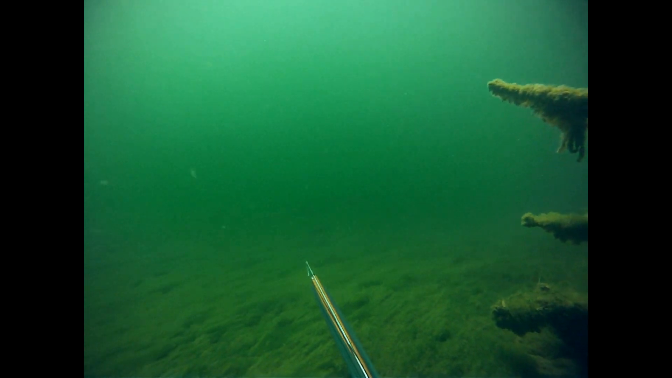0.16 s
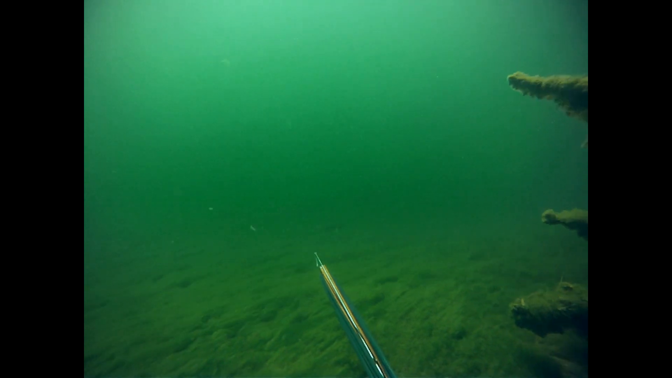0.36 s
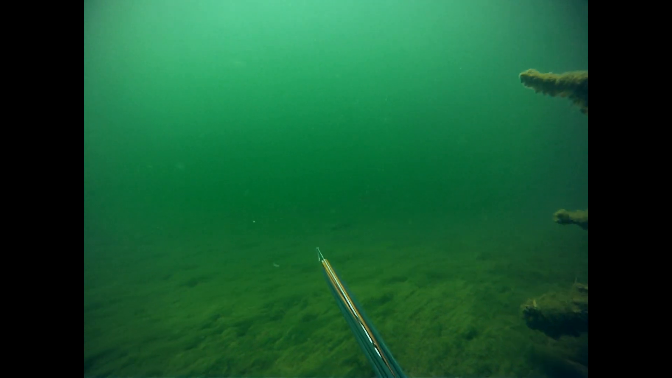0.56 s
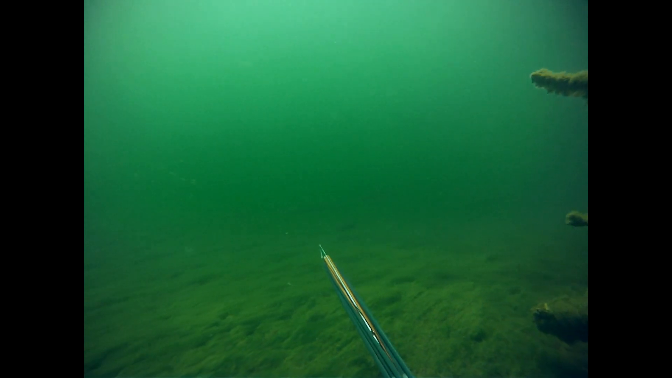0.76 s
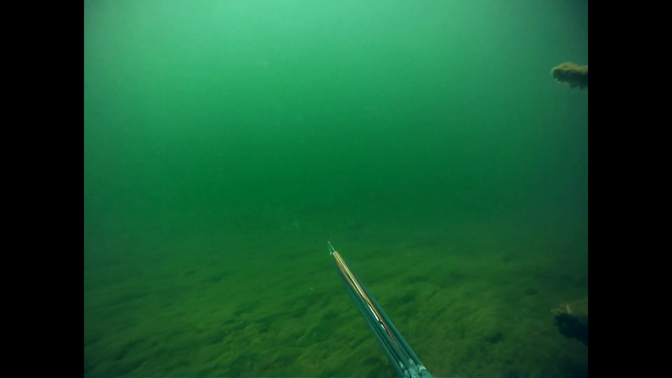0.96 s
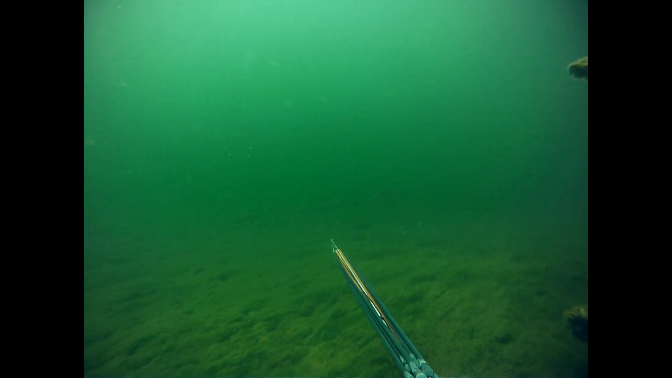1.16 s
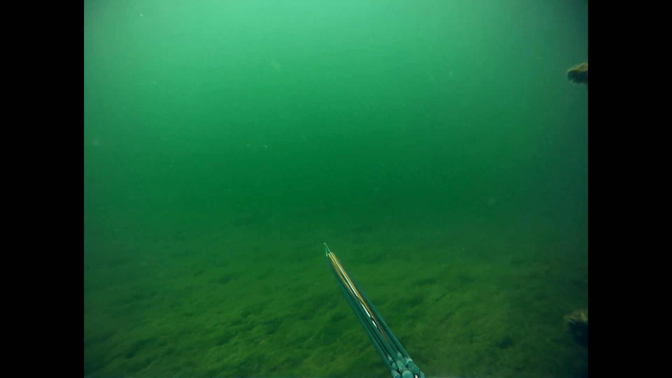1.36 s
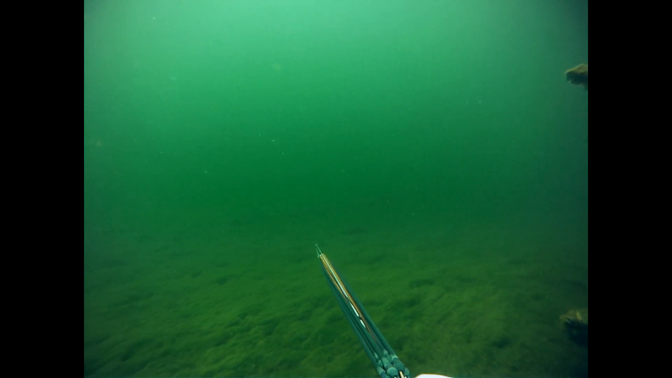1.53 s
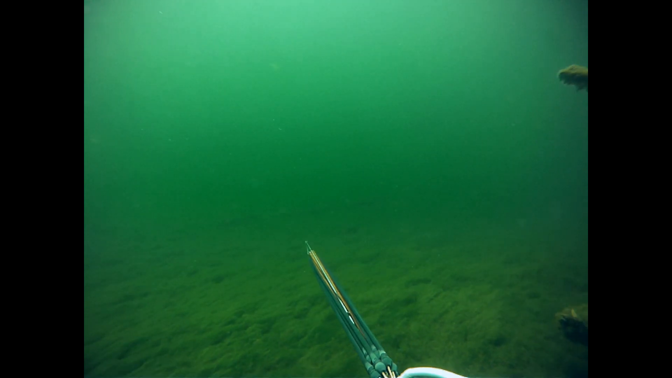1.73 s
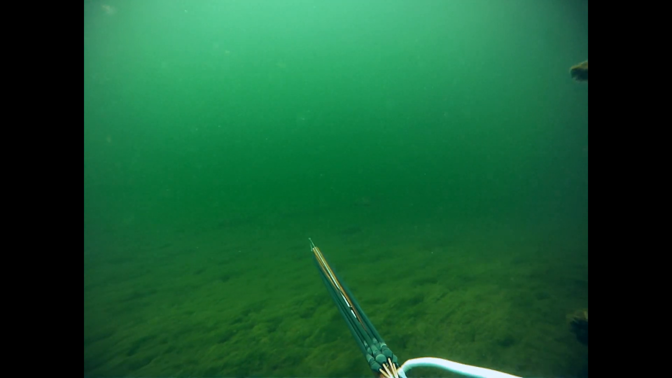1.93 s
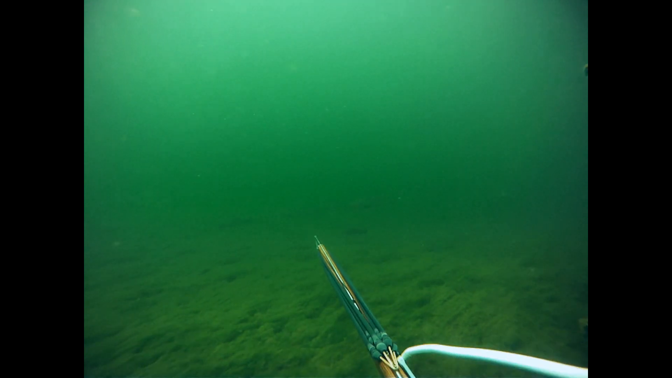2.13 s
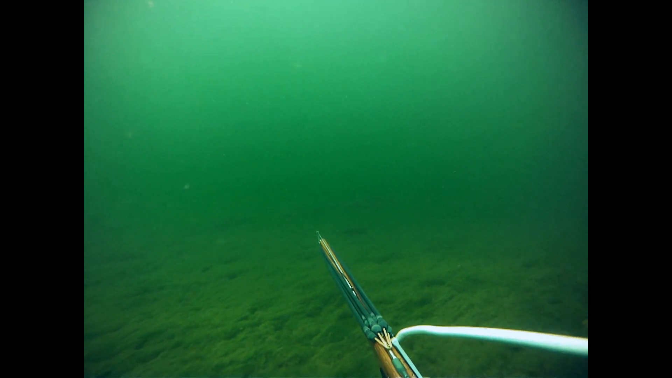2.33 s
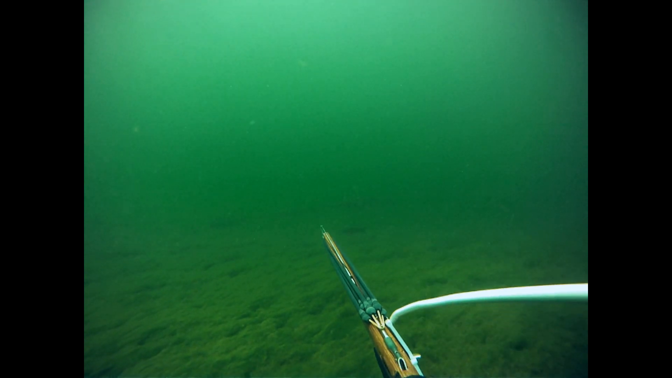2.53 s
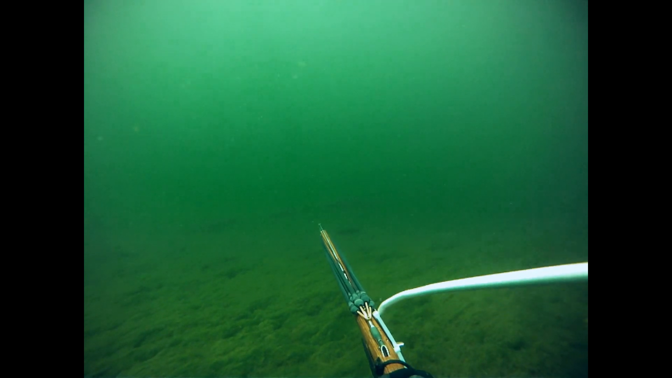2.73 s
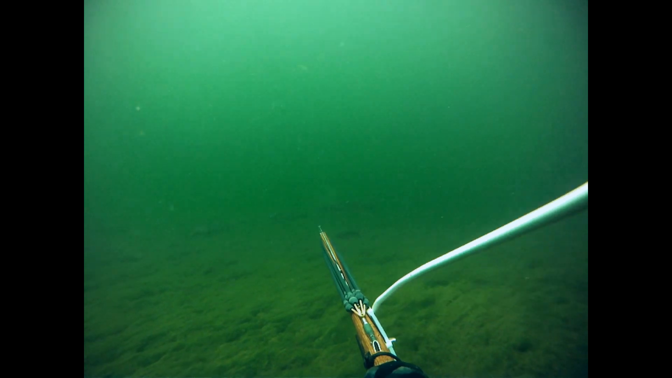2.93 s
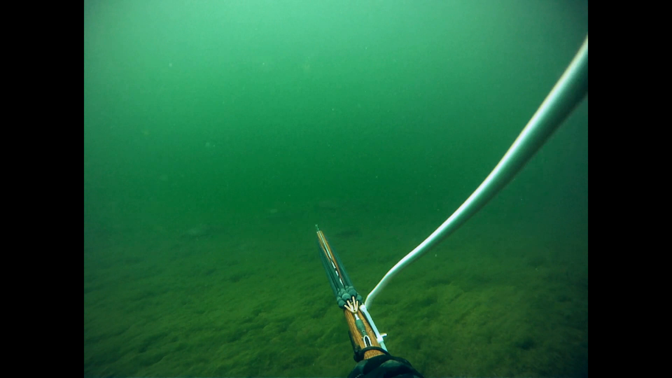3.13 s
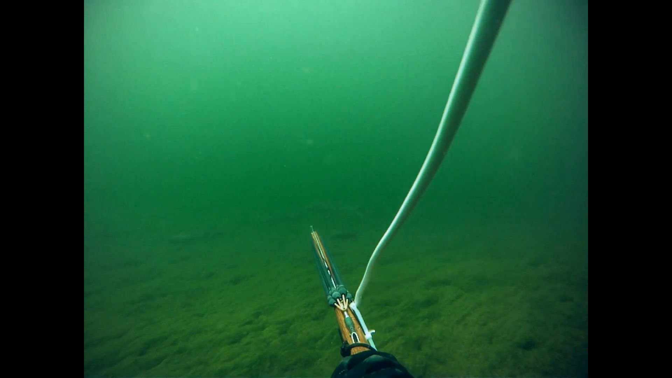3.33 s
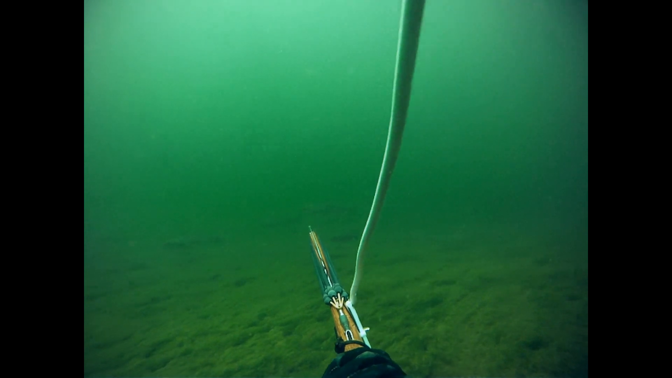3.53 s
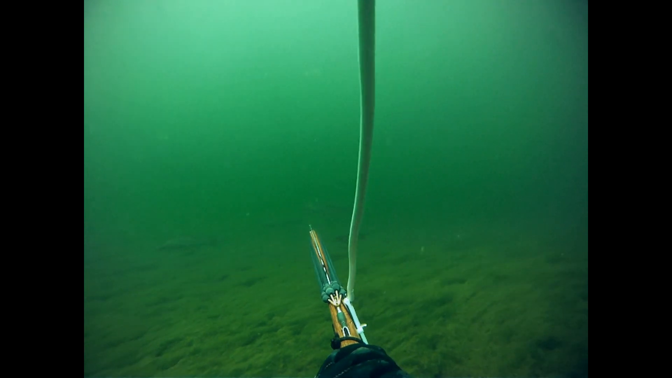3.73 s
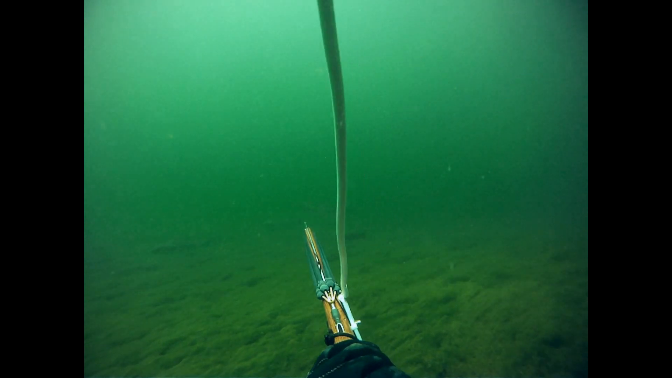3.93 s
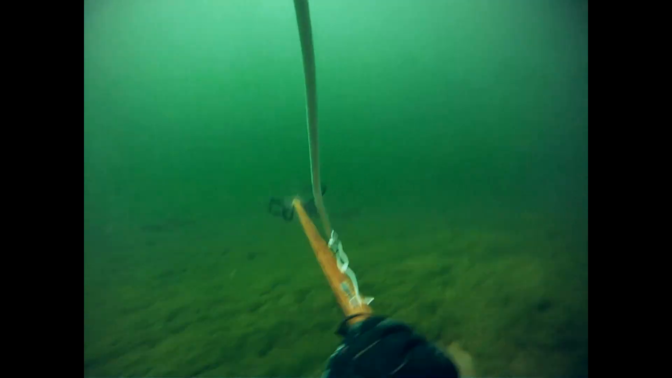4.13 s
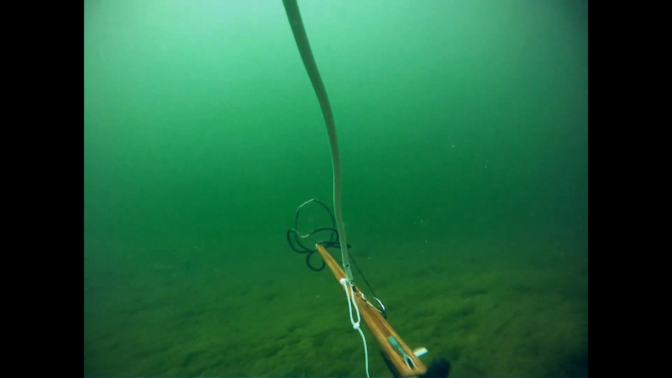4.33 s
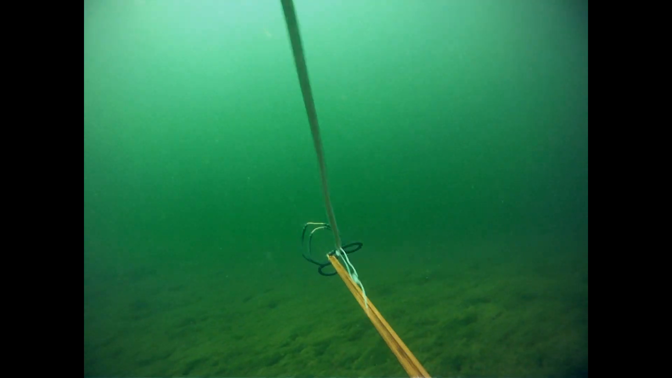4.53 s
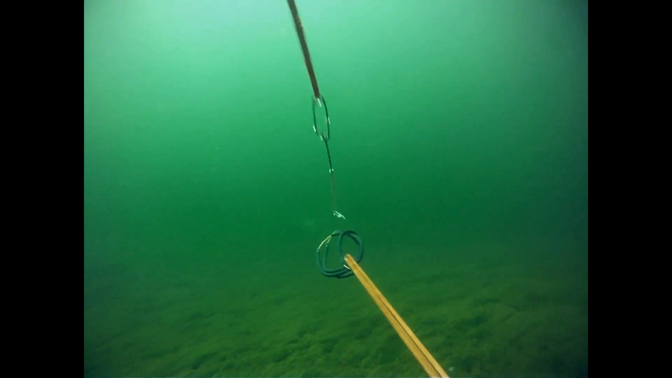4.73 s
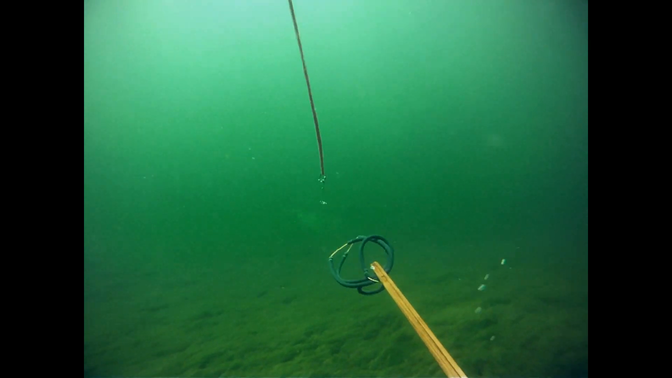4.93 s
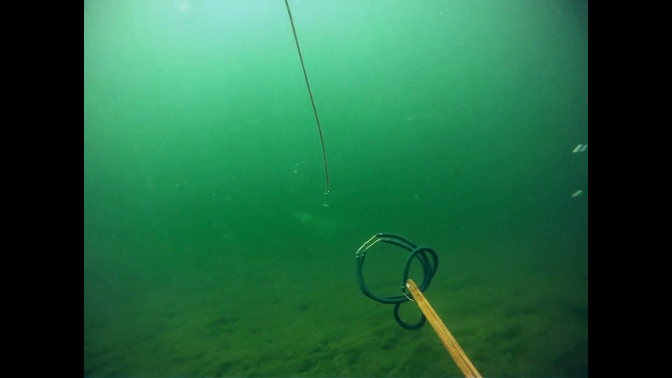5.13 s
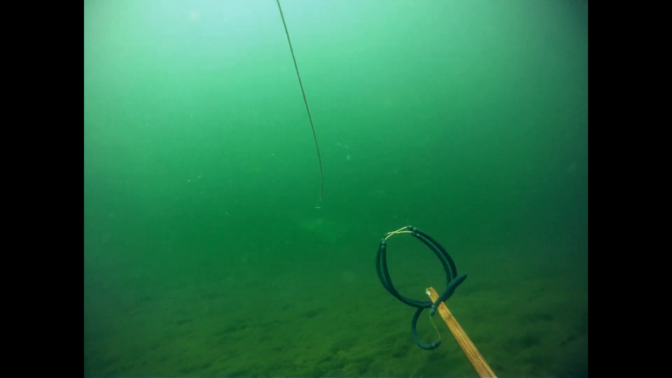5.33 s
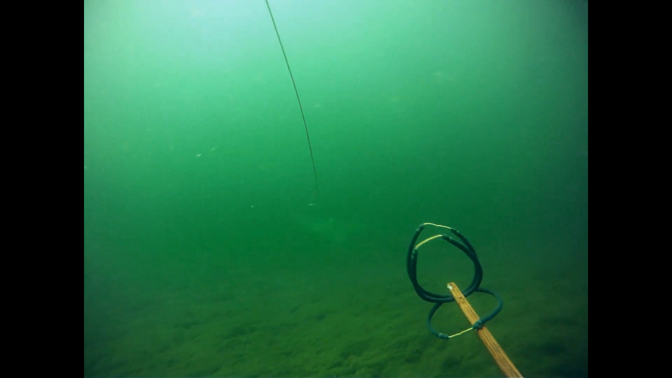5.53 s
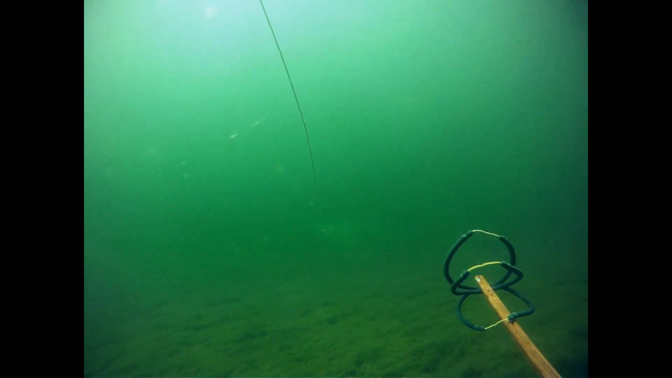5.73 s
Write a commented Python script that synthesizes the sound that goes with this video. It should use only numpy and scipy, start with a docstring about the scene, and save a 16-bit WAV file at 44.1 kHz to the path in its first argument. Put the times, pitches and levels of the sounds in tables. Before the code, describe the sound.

Underwater, a speargun knocks softly while aiming, then fires with one loud crack, a quick clatter and a fading rush of line.

```python
"""A speargun fired under water

Water rumbles round a camera in a sealed housing, and the gun's grip rubs and knocks while aiming.
The trigger cracks, the shaft scrapes off its rail and the rubber bands shove the water. The line
rattles out with a fading rush and a low strum. The camera samples coarsely, adding a gritty sheen."""
import sys
import numpy as np
from scipy.fft import rfft, irfft, next_fast_len
from scipy.io import wavfile
from scipy.ndimage import map_coordinates

SR = 44100
rng = np.random.default_rng(int(sys.argv[2]) if len(sys.argv) > 2 else 0)


def transcribe(signal):
    """Save signal, clipped to [-1, 1], as a 16-bit WAV file at the path in sys.argv[1]."""
    frames = np.atleast_2d(signal).T
    limited = np.clip(frames, -1, 1)
    pcm = np.round(limited * 32767).astype(np.int16)
    wavfile.write(sys.argv[1], SR, pcm)


N = 254898
TIME = np.arange(N) / SR
SHORT = TIME[:SR // 4]  # clock for one brief sound
FIRE_S, BANDS_MOVE_S = 4.02, 0.2  # when the trigger lets go, and how long the bands move
CAMERA_RATE_HZ = 12000


def amp(db):
    """Turn decibels into a number to multiply by."""
    return 10 ** (np.asarray(db) / 20)


def unit(x):
    """Scale a sound to an average (rms) strength of 1."""
    return x / np.sqrt(np.mean(x ** 2) + 1e-20)


def wobble(rate):
    """A smooth random curve through `rate` points a second."""
    return map_coordinates(rng.standard_normal(int(N * rate / SR) + 4), [TIME * rate])


def filtered(x, response):
    """Boost or cut each pitch in x as the response says."""
    size = next_fast_len(len(x) + 8192)
    return irfft(rfft(x, size) * response(np.fft.rfftfreq(size, 1 / SR)), size)[:len(x)]


def colour(points):
    """A response that joins up (pitch [Hz], level [dB]) points."""
    hz, db = np.transpose(points)
    return lambda f: amp(np.interp(np.log(f + 1), np.log(hz), db))


def resonant(modes):
    """The response of a thing that rings at each (pitch [Hz], width [Hz], level [dB])."""
    return lambda f: sum((-1) ** k * amp(db) * 1j * f * width / (hz * hz - f * f + 1j * f * width)
                         for k, (hz, width, db) in enumerate(modes))


def noise(response):
    """Noise shaped by a response, at strength 1."""
    return unit(filtered(rng.standard_normal(N), response))


def tone(hz, phase=0):
    """A brief pure tone; phase is in cycles."""
    return np.sin(2 * np.pi * (hz * SHORT + phase))


def swell(rise_s, order=1):
    """Rise to 1 at rise_s, then die away; a higher order makes a narrower bump."""
    progress = SHORT / max(rise_s, 1 / SR)
    return (progress * np.exp(1 - progress)) ** order


def add(track, s, sound):
    """Mix a sound in at s seconds."""
    part = track[round(s * SR):][:len(sound)]
    part += sound[:len(part)]


# Tone of still water and microphone hiss: (pitch [Hz], relative level [dB])
HISS_COLOUR = [(12, -47.5), (20, -4), (48, 1), (81, -7), (119, -5), (272, -12), (329, -15), (427, -15.5),
               (1730, -22.5), (2190, -23.5), (5030, -29), (5800, -29.5), (7540, -53), (12800, -120)]


def water(hiss_db=-60, rest_db=-70, push_db=-57, push_s=0.68):
    """Steady hiss, and a rumble of water round the housing that swells as the gun is pushed forward."""
    rumble = noise(colour([(15, -6.5), (42, -8), (100, -6.5), (200, -24), (600, -46.5)]))
    flow_db = np.interp(TIME, [FIRE_S - push_s, FIRE_S, N / SR], [rest_db, push_db, rest_db])
    return amp(flow_db + 2.5 * wobble(3)) * rumble + amp(hiss_db) * noise(colour(HISS_COLOUR))


def chinks(per_s, centre_hz, octaves, ring_s):
    """Tiny contacts ring at random moments, each with its own pitch and size."""
    out = np.zeros(N)
    brief = SHORT[:SR // 20]
    fade = amp(-60 * brief / ring_s)
    for moment, pitch, size in rng.random((int(per_s * N / SR), 3)):
        hz = centre_hz * 2 ** (octaves * (2 * pitch - 1))
        add(out, moment * N / SR, -np.log(size) * fade * np.sin(2 * np.pi * hz * brief))
    return unit(out)


def rubbing():
    """A faint scratchy rub early on, then the grip creaks just before the aim settles."""
    grit = chinks(per_s=700, centre_hz=3940, octaves=0.18, ring_s=0.0076)
    grit += 0.81 * noise(resonant([(4000, 900, 0)]))
    scratch = np.interp(TIME, [0.385, 0.4, 0.49, 0.505], [0.1, 0.33, 0.46, 0.098]) * unit(grit)
    groan = noise(lambda f: resonant([(370, 110, 0)])(f) ** 2)
    creak = np.interp(TIME, [2.64, 2.66, 2.705, 2.72], [0.037, 0.26, 0.84, 0.039]) * groan
    return amp(-60) * scratch + amp(-49) * creak


# The sharp edge of a hit, heard straight from the steel: (pitch [Hz], relative level [dB])
EDGE_COLOUR = [(200, -12), (700, -11), (1100, -25), (2300, -3.5), (4000, 4), (5800, -5)]
# How the steel shaft rings: (pitch [Hz], width [Hz], relative level [dB])
SHAFT_RING = [(1720, 31, -4.5), (1980, 28, -9), (2130, 32, -7), (2365, 24, -4.5), (3510, 70, -17)]


def hit(force, body, centre_hz, edge_db, shaft_db, focus_db=8):
    """A rough contact rings a body and the shaft, while its sharp edge arrives directly."""
    burst = rng.standard_normal(len(force)) * force
    even_spectrum = np.exp(1j * np.angle(rfft(burst)))  # all pitches are struck alike
    burst = irfft(even_spectrum, len(force)) * np.sqrt(force)
    edge = unit(filtered(burst, lambda f: colour(EDGE_COLOUR)(f) * (f < CAMERA_RATE_HZ / 2)))
    # the spot that is struck favours ringing near one pitch
    focus = resonant([(centre_hz, centre_hz / 4, 0)])
    burst = filtered(burst, lambda f: 1 + amp(focus_db) * focus(f))
    shaft = unit(filtered(burst, resonant(SHAFT_RING)))
    sound = unit(filtered(burst, resonant(body))) + amp(edge_db) * edge + amp(shaft_db) * shaft
    return unit(sound) * np.sqrt(np.mean(force ** 2))


# How the grip and the wooden barrel ring: (pitch [Hz], width [Hz], relative level [dB])
GRIP_RING = [(900, 580, -4), (1500, 390, 0), (1916, 345, 4), (2300, 280, 2.5), (3650, 300, -6)]
WOOD_RING = [(537, 370, -1.5), (757, 180, -0.5), (1090, 250, 1)]
# The wood's low tones under every thud: (pitch [Hz], relative level [dB])
HOLLOW_TONES = [(178, -10), (365, -12), (511, -18)]
# Knocks on the gun: (time [s], relative thud level [dB], relative click level [dB], thud pitch [Hz])
KNOCKS = [(0.508, -37.5, -43.5, 354), (0.539, -50, -48, 280), (0.569, -46, -62, 328),
          (1.405, -38, -63, 154), (1.7609, -27, -34.5, 281), (1.774, -31, -51, 345),
          (2.031, -43.5, -68, 324), (2.047, -37.5, -63, 366), (2.222, -39.5, -56, 282),
          (2.273, -37.5, -52, 345), (2.425, -40, -51.5, 334), (2.458, -43, -68, 366),
          (2.506, -39, -60, 294), (2.612, -38, -47, 370), (2.6231, -17, -25, 372),
          (2.629, -28.5, -33.5, 505), (2.695, -38, -42.5, 332), (2.721, -26.5, -23, 180),
          (4.155, -21.5, -42, 223), (4.175, -17.5, -13, 209), (4.182, -22, -42, 495),
          (4.725, -37.5, -44, 526), (4.842, -39.5, -61, 376), (4.968, -41.5, -59, 363),
          (5.521, -44.5, -58, 342), (5.633, -49, -58, 298)]


def knocks(wood_lag_s=0.00154, thud_rise_s=0.0011, thud_fade_s=0.048):
    """Hand, bands and line click on the gun; the wood answers with a hollow thud that the hand damps."""
    out = np.zeros(N)
    thud_shape = (1 - np.exp(-SHORT / thud_rise_s)) * amp(-60 * SHORT / thud_fade_s)
    for s, thud_db, click_db, thud_hz in KNOCKS:
        # harder clicks are shorter and higher
        tap_s = 0.00075 * 2 ** (-(click_db + 30) / 28)
        click_hz = 1900 * 2 ** ((click_db + 26.5) / 58)
        force = swell(tap_s) + 0.11 * swell(0.0037)  # a tap, then brief chatter
        edge_db = click_db - thud_db - 17
        click = hit(force, GRIP_RING, click_hz, edge_db, shaft_db=-15, focus_db=11.5)
        add(out, s, amp(click_db - 3) * click)
        wood = hit(swell(0.002), WOOD_RING, centre_hz=447, edge_db=-35, shaft_db=-34, focus_db=19)
        add(out, s + wood_lag_s, amp(click_db - 17) * wood)
        thud = tone(thud_hz) + sum(amp(db) * tone(hz, rng.random()) for hz, db in HOLLOW_TONES)
        add(out, s + wood_lag_s, amp(thud_db - 1) * thud_shape * thud)
    return out


# How the camera housing rings: (pitch [Hz], width [Hz], relative level [dB])
HOUSING_RING = [(1296, 380, -4.5), (1635, 266, 4.5), (2304, 350, 2.5), (3400, 58, -9.5), (4100, 86, -7),
                (4330, 690, -13)]


def trigger(clang_hz=1770):
    """The latch lets go and the shaft cracks free, driving the housing into a brief clang."""
    out = np.zeros(N)
    latch = hit(swell(0.00083), HOUSING_RING, centre_hz=1870, edge_db=-12, shaft_db=-10)
    crack = hit(swell(0.0017, order=2), HOUSING_RING, centre_hz=2100, edge_db=-2, shaft_db=-18.5)
    clang = swell(0.003, order=4) * tone(clang_hz)
    add(out, 4.0209, amp(-14) * latch)
    add(out, 4.0228, amp(-4) * crack)
    add(out, 4.0208, amp(-5) * clang)
    return out


def barrel():
    """The wooden barrel barks at the release and rasps while the shaft slides along it."""
    out = np.zeros(N)
    kick = swell(0.0023, order=2)
    bark = hit(kick, WOOD_RING, centre_hz=850, edge_db=-30.5, shaft_db=-29, focus_db=-9.5)
    slide = np.interp(SHORT, [0, 0.012, 0.028, 0.038], [0.33, 1, 0.86, 0.073])
    rasp = hit(slide, WOOD_RING, centre_hz=790, edge_db=-32.5, shaft_db=-26, focus_db=-16)
    add(out, 4.0215, amp(-23) * bark)
    add(out, 4.041, amp(-34) * rasp)
    return out


# Tone of the churning water: (pitch [Hz], relative level [dB])
WAKE_COLOUR = [(15, -0.5), (45, 4.5), (90, 1.5), (160, -5), (260, -16.5), (360, -19), (520, -13.5),
               (640, -32), (1000, -20), (2000, -65)]
# Water shoved by the gun's kick and the bands:
# (time [s], level [dB], first pitch [Hz], last pitch [Hz], glide time [s], rise time [s])
SHOVES = [(4.0215, -7, 150, 42, 0.011, 0.0056), (4.144, -22.5, 95, 120, 0.0092, 0.0042),
          (4.151, -12, 218, 34.6, .007, 0.0088), (4.177, -20.5, 24, 32, 0.035, .022)]


def recoil(churn_db=-32.5, churn_fade_db_per_s=225, eddy_db=-45, eddy_fade_db_per_s=11):
    """Shoved water sucks and swings back and forth, churns while the bands move, and leaves eddies."""
    out = np.zeros(N)
    for s, db, first_hz, last_hz, glide_s, rise_s in SHOVES:
        hz = last_hz + (first_hz - last_hz) * np.exp(-SHORT / glide_s)
        add(out, s, -amp(db) * swell(rise_s, order=2) * np.sin(2 * np.pi * np.cumsum(hz) / SR))
    age = np.maximum(TIME - FIRE_S, 0)
    fade_in = np.minimum(age / 0.014, 1)
    churn = amp(churn_db - churn_fade_db_per_s * np.maximum(age - BANDS_MOVE_S, 0))
    eddies = amp(eddy_db - eddy_fade_db_per_s * age)
    return out + fade_in * np.hypot(churn, eddies) * noise(colour(WAKE_COLOUR))


# Tugs that pull the line off its wraps: (time [s])
TUG_TIMES = [4.365, 4.485, 4.528, 4.643, 4.74, 4.86, 4.95, 5.184, 5.315]


def strum(pitch_hz=98, width_hz=42, flutter_db=-47.5, tug_db=-35, fade_db_per_s=11):
    """The tight line flutters as it sheds eddies and throbs at each tug; both fade as the shaft slows."""
    tightness = np.clip((TIME - FIRE_S) / BANDS_MOVE_S, 0, 1)
    out = tightness * amp(flutter_db) * noise(lambda f: resonant([(pitch_hz, width_hz, 0)])(f) ** 2)
    for s in TUG_TIMES:
        hz = pitch_hz * (1 + 0.048 * rng.standard_normal())
        add(out, s, amp(tug_db) * swell(rise_s=0.028, order=3) * tone(hz, rng.random()))
    return out * amp(-fade_db_per_s * np.maximum(TIME - TUG_TIMES[0], 0))


# Loudness of the running line: (time [s], relative level [dB])
RUSH_LEVELS = [(4.24, -44.5), (4.27, -47.5), (4.746, -54), (5.08, -61), (5.332, -62), (5.492, -57),
               (5.78, -64.5)]
# Tone of its friction: (pitch [Hz], relative level [dB])
RUSH_COLOUR = [(180, -29), (300, -9.5), (352, -1.5), (419, -23), (511, -1), (571, -40), (714, -5),
               (893, -28), (1120, -12.5), (1470, -0.5), (2210, -1), (2760, -12.5), (3360, -15.5),
               (3950, -10), (5800, -20), (7540, -51), (12800, -120)]


def line_rush(chink_db=-4, surge_db=1.67):
    """The line runs out in an uneven rush of friction and tiny chinks."""
    level_db = np.interp(TIME, *np.transpose(RUSH_LEVELS)) + 1 + surge_db * wobble(22)
    fade_in = np.interp(TIME, [4.03, 4.06], [0, 1])
    rough_noise = rng.standard_normal(N) * amp(2.6 * wobble(400) + 2.3 * wobble(45))
    friction = unit(filtered(rough_noise, colour(RUSH_COLOUR)))
    rattle = chinks(per_s=240, centre_hz=1897, octaves=0.397, ring_s=0.047)
    return fade_in * amp(level_db) * unit(friction + amp(chink_db) * rattle)


def scrape(length_s, centre_hz, edge_db):
    """One sliding contact: uneven pressure builds, holds and lets go."""
    pressure = np.interp(SHORT / length_s, [0, 0.15, 0.6, 1, 1.3], [0.6, 0.88, 0.88, 0.37, 0.0041])
    roughness = amp(1.4 * wobble(477)[:len(SHORT)])
    return hit(pressure * roughness, HOUSING_RING, centre_hz, edge_db, shaft_db=-8.5)


# Sliding contacts: (time [s], length [s], level [dB], sharp edge [dB], pitch [Hz])
SCRAPES = [(4.038, 0.017, -18, -11, 2070), (4.051, 0.015, -19, -10.5, 1450), (4.129, 0.023, -37, 11, 2400),
           (4.177, 0.018, -24, -7, 1940), (4.2, 0.0088, -31, 4, 3580), (4.202, 0.033, -28, -19, 1580),
           (4.426, 0.031, -37.5, -2, 2280), (4.577, 0.026, -42, -32, 1710), (5.004, 0.051, -55, -30, 1700),
           (5.363, 0.047, -55, -19, 1920)]


def scrapes():
    """The shaft scrapes along its rail, and fainter scrapes follow."""
    out = np.zeros(N)
    for s, length_s, db, edge_db, hz in SCRAPES:
        add(out, s, amp(db) * scrape(length_s, hz, edge_db))
    return out


def clack(centre_hz, edge_db, shaft_db):
    """One hard, quick contact rings the housing and the shaft."""
    return hit(swell(rise_s=0.0011, order=2), HOUSING_RING, centre_hz, edge_db, shaft_db)


# Hard contacts: (time [s], relative level [dB], relative sharp edge [dB], pitch [Hz])
CLACKS = [(4.0675, -18, -18, 1600), (4.077, -22.5, 3, 2000), (4.094, -32, -14, 1550),
          (4.129, -15, -34, 2020), (4.1367, -6.5, -12, 2430), (4.1752, -15.5, -23, 1850),
          (4.182, -12, -18, 2180), (4.1900, -17, -32, 2030), (4.2554, -30, -13, 2000),
          (4.274, -29, -8, 2200), (4.2954, -22, -22, 1760), (4.3327, -33.5, -36, 1830),
          (4.3972, -28, -17, 2900), (4.404, -12.5, -17, 2370), (4.4191, -25, -13, 2190),
          (4.4304, -22, -18, 2240), (4.4475, -25, -11, 1900), (4.577, -33, -31, 1700),
          (4.643, -32, -24, 2270), (4.7208, -40, -26, 2020), (4.814, -38, -29, 2310),
          (5.009, -38.5, -37, 1600)]


def loose_parts():
    """The shaft, the line and the wishbone (the link between bands and shaft) clack after the shot."""
    out = np.zeros(N)
    for s, db, edge_db, hz in CLACKS:
        add(out, s, amp(db - 5) * clack(hz, edge_db + 9, shaft_db=-19.5))
    return out


def shaft_ping(level_db=-17, pitch_hz=3560, ring_s=0.011):
    """The shaft's tail pings once as it clears the muzzle."""
    out = np.zeros(N)
    add(out, 4.206, amp(level_db - 60 * SHORT / ring_s) * tone(pitch_hz))
    return out


def snags(ticks_per_s=12, scatter_db=4, first_slip_s=5.627, slip_gap_s=0.04):
    """The running line ticks on the gun at random, then sticks and slips three times, ever weaker."""
    out = np.zeros(N)
    start_s = FIRE_S + BANDS_MOVE_S
    span_s = first_slip_s - start_s
    for moment, size in rng.random((int(ticks_per_s * span_s), 2)):
        s = start_s + moment * span_s
        db = np.interp(s, *np.transpose(RUSH_LEVELS)) + 8  # ticks stand out above the rush
        db += scatter_db * (2 * size - 1)
        add(out, s, amp(db) * clack(centre_hz=2000, edge_db=-10, shaft_db=-16))
    for k, db in enumerate([-46, -49, -52]):
        slip = scrape(length_s=0.013, centre_hz=1980, edge_db=-25)
        add(out, first_slip_s + k * slip_gap_s, amp(db) * slip)
    return out


def scene():
    """One microphone inside the housing feeds both channels."""
    mono = water() + rubbing() + knocks()
    mono += trigger() + barrel() + recoil() + strum() + line_rush()
    mono += scrapes() + loose_parts() + shaft_ping() + snags()
    return np.array([mono, mono])


def record(dry, ceiling=0.7, cutoff_hz=5650, top_hz=15600):
    """The camera squashes peaks, samples slowly and holds each sample, mirroring sound into the treble."""
    clipped = dry[0] / (1 + (dry[0] / ceiling) ** 8) ** (1 / 8)
    dulled = filtered(clipped, lambda f: 1 / np.sqrt(1 + (f / cutoff_hz) ** 60))
    mirrored = dulled * (1 + 2 * np.cos(2 * np.pi * CAMERA_RATE_HZ * TIME))
    out = filtered(mirrored, lambda f: np.sinc(f / CAMERA_RATE_HZ) / np.sqrt(1 + (f / top_hz) ** 120))
    return np.array([out, out])


dry = scene()
out = record(dry)
transcribe(out)
```